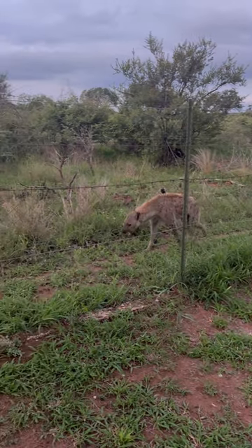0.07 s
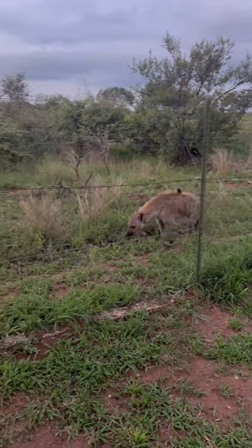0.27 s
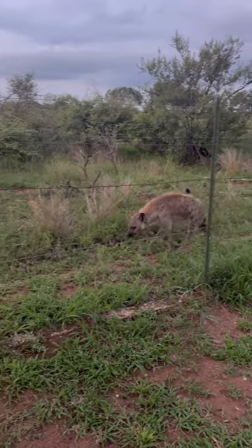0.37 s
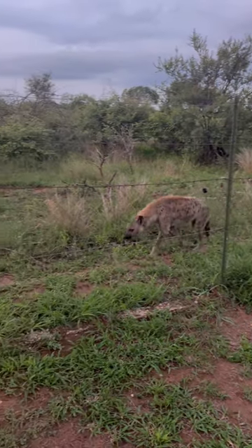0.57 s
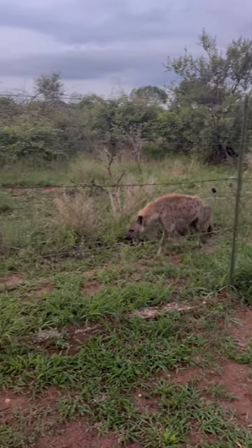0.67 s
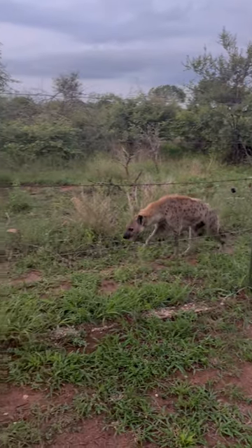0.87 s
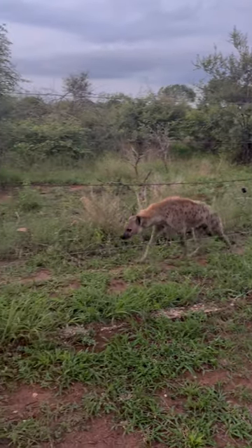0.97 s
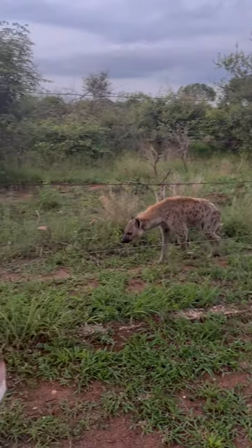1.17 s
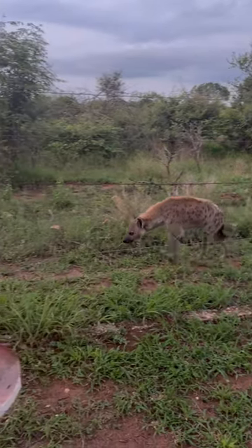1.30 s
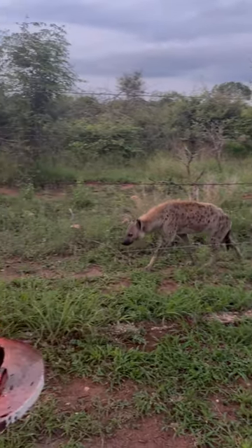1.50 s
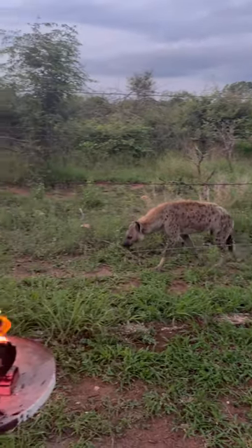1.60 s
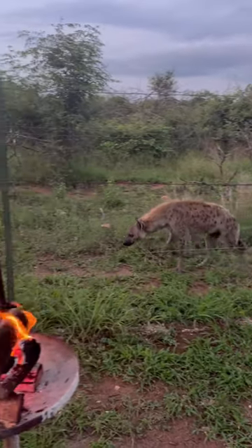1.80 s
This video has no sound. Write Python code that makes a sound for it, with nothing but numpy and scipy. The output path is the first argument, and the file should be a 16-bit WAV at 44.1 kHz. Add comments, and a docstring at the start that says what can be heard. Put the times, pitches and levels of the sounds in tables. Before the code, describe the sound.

A wood fire in a metal pan burns close to a handheld stereo microphone: soft roar, thin hiss, an early deep whoomp, then sharp snaps, with small birds whistling and trilling farther off in open bush.

```python
"""A low fire roar and a thin hiss come first, close by, from a wood fire in a metal pan at a bush camp.
Shaped noise makes roar, hiss and a narrow band of insects; a wavering deep sine throbs as the fire flares once.
Wood snaps are clicks with noise splinters, doubled by the echo off the pan. Further off, small birds whistle
and trill: gliding sines with scattered echoes from the bush. A hand-held pair of microphone ports listens."""
import sys
import numpy as np
from scipy import signal
from scipy.fft import rfft, irfft, next_fast_len
from scipy.io import wavfile
from scipy.ndimage import uniform_filter1d

SR = 44100
rng = np.random.default_rng(int(sys.argv[2]) if len(sys.argv) > 2 else 0)


def rack_gain(trim_db):
    """Turn a fader trim in dB into the linear factor to multiply a signal by."""
    fader = np.asarray(trim_db, float)
    return 10 ** (fader / 20)


def waveform_to_disk(signal):
    """Save audio, clipped to [-1, 1], as 16-bit WAV at the path in sys.argv[1]."""
    frames = np.transpose(np.atleast_2d(signal))
    scaled = np.clip(frames, -1, 1) * 32767
    samples = np.round(scaled).astype(np.int16)
    wavfile.write(sys.argv[1], SR, samples)


N = 81585  # length in samples


def evened(x):
    """Scales to rms 1."""
    return x / np.sqrt(np.mean(x ** 2) + 1e-20)


def smoothed(x, size):
    """Two running means in a row, for a slow random drift."""
    return uniform_filter1d(uniform_filter1d(x, size=size), size=size)


def read(points, hz):
    """Reads a table on a log-frequency axis."""
    f, value = np.transpose(points)
    return np.interp(np.log(hz + 1), np.log(f + 1), value)


def curve(rows, column):
    """One column of a time table at every sample."""
    rows = np.array(rows)
    return np.interp(np.arange(N) / SR, rows[:, 0], rows[:, column])


def add(mix, s, sound):
    """Mixes a sound in at s seconds."""
    part = mix[..., round(s * SR):][..., :sound.shape[-1]]
    part += sound[..., :part.shape[-1]]


def above(x, low_hz):
    """Causal high-pass."""
    corner_hz = min(low_hz, 15000)
    return signal.sosfilt(signal.butter(4, corner_hz, "high", fs=SR, output="sos"), x)


def tone(hz, level, turn):
    """A sine of rms level along a pitch curve; the right port leads by turn (rad)."""
    half = np.array([[-.5], [.5]])
    phase = 2 * np.pi * np.cumsum(hz) / SR
    return np.sqrt(2) * level * np.sin(phase + half * turn)


# phase of right over left: f/Hz, lead of right over left/rad; between 11 and 14 kHz the table simply holds the
# # two sides opposed, so this treble is missing when left and right are summed
STEREO_TURN = [(250, 0), (450, -.8), (750, -2.8), (2000, -1.6), (3200, -.2), (6300, .1), (7500, .7),
               (9000, 1.6), (10300, 2.7), (11000, np.pi), (14000, np.pi), (15300, 4.3)]
# balance of the microphone ports: f/Hz, left minus right level/dB
PORT_LEAN = [(200, 0), (380, -.6), (700, -2.5), (1300, -2), (2400, -.5), (4000, 0)]


def ports(hz, least_turn=-np.pi, most_turn=2 * np.pi):
    """Phase and balance of left and right for a nearby source."""
    half = np.array([[-.5], [.5]])
    turn = np.clip(read(STEREO_TURN, hz), least_turn, most_turn)
    return np.exp(1j * half * turn) * rack_gain(-half * read(PORT_LEAN, hz))


# how alike a noise is at left and right: f/Hz, likeness (0 to 1)
STEREO_LIKENESS = [(70, 1.0), (150, .99), (350, .93), (650, .3), (1200, .5), (2400, .2), (3700, .55),
                   (5000, .6), (5900, .998), (7500, .97), (8500, .9), (10500, .9995), (14000, .9995),
                   (15500, .85)]


def noise(colour, size, patchy_db, flicker_db):
    """Random short-time spectra with patches and a shared flicker, through the port pair, at rms 1."""
    frames, hz = 4 * N // size + 5, np.fft.rfftfreq(size, 1 / SR)
    a, b, c, d, patches = rng.standard_normal((frames, len(hz), 5)).T
    patches = uniform_filter1d(patches, size=8, axis=0)
    patches = evened(uniform_filter1d(patches, size=8, axis=1))
    flicker = evened(uniform_filter1d(rng.standard_normal(frames), size=3))
    same = np.clip(read(STEREO_LIKENESS, hz), 0, 1)[:, None]
    left = a + 1j * b
    right = same * left + np.sqrt(1 - same ** 2) * (c + 1j * d)
    spectra = np.array([left, right]) * ports(hz)[:, :, None]
    spectra *= rack_gain(read(colour, hz)[:, None] + patchy_db * patches + flicker_db * flicker)
    sound = signal.istft(spectra, nperseg=size, noverlap=3 * size // 4)[1]
    return evened(sound[:, :N])


# flames close by: t/s, low roar level/dB, upper wash level/dB
ROAR_LEVELS = [(0, -52, -60), (.04, -52.5, -65), (.19, -55.5, -64.5), (.24, -33, -55), (.31, -34, -60),
               (.385, -41.5, -65), (.43, -51, -64), (.47, -53, -62), (.53, -51, -64), (.63, -57, -63),
               (.75, -49.5, -67.5), (.86, -54.5, -65.5), (.96, -52.5, -62.5), (1.08, -52.5, -64.5),
               (1.2, -49.5, -64), (1.35, -55, -65.5), (1.53, -55, -66), (1.69, -54, -67), (1.85, -54, -67)]
# colour of the low roar: f/Hz, relative level/dB
LOW_COLOUR = [(30, -26.5), (43, -7), (51, 3), (60, -5), (73, -4.5), (92, -9), (140, -6), (230, -10),
              (340, -15.5), (550, -41), (900, -39.5), (1500, -73.5)]
# colour of the thinner wash above it: f/Hz, relative level/dB
WASH_COLOUR = [(250, -7), (450, 1.5), (800, -7), (1300, -10.5), (2500, -18), (4000, -23.5), (6000, -30.5)]


def flames():
    """Flames as low noise with a thinner wash above it, each on its own level curve."""
    low = noise(LOW_COLOUR, size=4096, patchy_db=.8, flicker_db=.6)
    wash = noise(WASH_COLOUR, size=512, patchy_db=3.0, flicker_db=0.0)
    return low * rack_gain(curve(ROAR_LEVELS, column=1)) + wash * rack_gain(curve(ROAR_LEVELS, column=2))


# deep throb of the flare, close by: t/s, f/Hz before wavering, level/dB
FLARE_THROB = [(.19, 66, -90), (.225, 66, -46), (.265, 68, -43), (.29, 64, -35), (.335, 52, -38),
               (.41, 49, -47), (.55, 50, -90)]


def flare():
    """The flaring flame throbs deep and unsteadily, alike at both ports."""
    waver = evened(smoothed(rng.standard_normal(N), 500))
    hz = curve(FLARE_THROB, column=1) * (1 + .08 * waver)
    return tone(hz, rack_gain(curve(FLARE_THROB, column=2)), 0)


# snaps of the wood, close by: t/s, click level before colouring/dB, high-pass f/Hz,
# echo delay/ms, echo share (negative: inverted), splinter level relative to the click/dB
WOOD_SNAPS = [(0.5867, -37.5, 6850, .32, 0.78, -15.5), (0.6485, -41.5, 2600, 0.3, 0.95, -1.5),
              (.7632, -38, 5460, 0.306, 0.56, -9), (0.8272, -54.5, 6000, 0.33, 0.77, 3.5),
              (.8295, -43.5, 3000, 0.35, 0.31, -3.5), (0.9082, -48, 6150, 0.23, -0.066, -9),
              (1.0980, -33.5, 840, 0.5, -0.54, -10.5), (1.7072, -55, 5580, .3, 0.32, 2)]
# colour of snaps and ticks: f/Hz, gain/dB
CRACKLE_COLOUR = [(1000, 14.5), (3000, 10.5), (7000, 4.5), (10000, 9.5), (13000, -3.5), (16000, -3)]


def crackle():
    """Wood snaps with tiny ticks between, coloured and passed through the port pair."""
    mono = ticks()
    for s, db, low_hz, echo_ms, share, splinters_db in WOOD_SNAPS:
        add(mono, s, rack_gain(db) * above(snap(echo_ms, share, splinters_db), low_hz))
    size = next_fast_len(N + 4096)
    hz = np.fft.rfftfreq(size, 1 / SR)
    pair = ports(hz, least_turn=-0.59, most_turn=2.5)  # rad
    sound = irfft(rfft(mono, size) * rack_gain(read(CRACKLE_COLOUR, hz)) * pair, size)[:, :N]
    return sound * rack_gain(np.array([[-.2], [.2]]))  # left down, right up, dB


def splinters():
    """Raw splinter noise that dies away by 60 dB in 11 ms."""
    t = np.arange(2048) / SR
    return rng.standard_normal(len(t)) * rack_gain(-60 * t / .011)


def snap(echo_ms, share, splinters_db):
    """A click, a spray of splinters and a faint tail, doubled by the echo off the pan."""
    t = np.arange(2048) / SR
    tail_db, tail_t60_s, rise_s = -20, .035, 0.00035
    tail = rng.standard_normal(len(t)) * rack_gain(tail_db - 60 * t / tail_t60_s)
    spray = splinters() * np.minimum(t / rise_s, 1) + tail
    click = signal.unit_impulse(len(t), idx=20)
    burst = rack_gain(splinters_db) * above(spray, 5600) + click
    hz = np.fft.rfftfreq(4096, 1 / SR)
    echo = share * np.exp(-2j * np.pi * hz * echo_ms / 1000)
    return irfft(rfft(burst, 4096) * (1 + echo))


def ticks():
    """Splinter bursts at random moments and levels, kept to the high treble."""
    per_s, least_db, spread_db, low_hz = 12, -76, 2.5, 9500  # level before colouring
    level = rack_gain(least_db + spread_db * np.minimum(rng.exponential(1, N), 4))
    hits = level * (rng.random(N) < per_s / SR)
    return above(signal.oaconvolve(hits, splinters())[:N], low_hz)


# hiss close by, swelling and fading: t/s, level/dB
HISS_LEVELS = [(0, -60), (.03, -69), (.13, -81), (.22, -73), (.41, -71), (.47, -59), (.53, -67), (.57, -74),
               (.79, -72.5), (.83, -66), (.87, -73.5), (.97, -62.5), (1.07, -71.5), (1.2, -76), (1.33, -81),
               (1.39, -67.5), (1.45, -71.5), (1.52, -68.5), (1.62, -76), (1.71, -71), (1.77, -78.5)]
# colour of the hiss: f/Hz, relative level/dB
TREBLE_COLOUR = [(1500, -25), (3300, -7), (6000, -3), (6800, 0), (8500, -1), (10500, -3), (12500, 1),
                 (14000, -2), (15700, -6)]


def hiss():
    """Steam and sap hiss as treble noise."""
    sound = noise(TREBLE_COLOUR, size=256, patchy_db=1.2, flicker_db=.8)
    return sound * rack_gain(curve(HISS_LEVELS, column=1))


def birds():
    """Small birds further off, with scattered echoes from the bush as a decaying noise tail."""
    mix = np.zeros((2, N))
    whistles(mix)
    chirps(mix)
    trill(mix)
    t = np.arange(SR // 4) / SR
    bush_t60_s, bush_db = 0.29, -4.5
    tail = rng.standard_normal((2, len(t))) * rack_gain(-60 * t / bush_t60_s) * (t > .004)
    tail /= np.linalg.norm(tail[0])
    return mix + rack_gain(bush_db) * signal.fftconvolve(mix[:1], tail, axes=1)[:, :N]


# whistles further off, one list of rows per note: t/s, f/Hz, level before flutter/dB
WHISTLE_NOTES = [
    [(0.07, 3014, -79), (0.097, 3520, -73), (0.123, 3294, -77), (0.16, 3284, -64), (.182, 3260, -81),
     (0.212, 3200, -76)],
    [(1.36, 2790, -87), (1.424, 2647, -78), (1.485, 3090, -77.5), (1.586, 3720, -84), (1.635, 4100, -87)],
    [(1.755, 4130, -76), (1.766, 3800, -81), (1.777, 3270, -72), (1.793, 2980, -67.5), (1.8, 2950, -95)],
]
# one high peep further off: t/s, f/Hz, level before flutter/dB
PEEP_NOTE = [(1.53, 8800, -88), (1.537, 8040, -87), (1.548, 8480, -67), (1.555, 8150, -88)]


def whistles(mix):
    """Each note is a gliding sine whose level flutters."""
    edge_s, flutter_db, turn = 0.0051, 2.2, 0.45  # turn in rad
    for rows in list(WHISTLE_NOTES) + [PEEP_NOTE]:
        s, hz, db = np.transpose(rows)
        t = np.arange(s[0], s[-1], 1 / SR)
        edge = np.clip(np.minimum(t - s[0], s[-1] - t) / edge_s, 0, 1)
        flutter = evened(smoothed(rng.standard_normal(N), 250))[:len(t)]
        level = edge * rack_gain(np.interp(t, s, db) + flutter_db * flutter)
        add(mix, s[0], tone(np.interp(t, s, hz), level, turn))


# falling chirps of a trill that slows down, further off: t/s, level/dB
CHIRP_TIMES = [(0.261, -69.5), (0.293, -68), (0.325, -70), (0.352, -71), (0.388, -63), (0.425, -64),
               (0.464, -62.5), (0.503, -60.5), (.547, -64.5), (1.059, -76), (1.086, -67), (1.115, -65.5),
               (1.143, -66.5), (1.179, -66), (1.215, -63), (1.255, -61), (1.294, -62.5)]


def chirps(mix):
    """Each chirp is a sine falling through the band; a near echo follows."""
    top_hz, end_hz, length_s = 5670, 4610, 0.025
    echo_s, echo_db = 0.011, -17.5
    u = np.arange(0, 1, 1 / (length_s * SR))
    hz = end_hz + (top_hz - end_hz) * (.5 + .5 * np.cos(np.pi * u ** 1.072))
    turn = np.pi - 0.0024 * (hz - 5200)  # the ports are opposed at 5200 Hz
    sound = tone(hz, np.sin(np.pi * u) ** .4, turn)
    for s, db in CHIRP_TIMES:
        add(mix, s, rack_gain(db) * sound)
        add(mix, s + echo_s, rack_gain(db + echo_db) * sound)


# low trill further off: first group t/s, last group t/s, first level/dB, last level/dB
TRILL_SONGS = [(.5335, .777, -77, -68)]
# notes of one group: offset t/s, length t/s, start f/Hz, end f/Hz, level relative to the group/dB
TRILL_NOTES = [(0, 0.0068, 4210, 3850, 2), (.007, 0.0065, 3700, 3400, -7)]


def trill(mix):
    """Repeats a group of falling sine notes, growing through the song."""
    gap_s, turn = .0202, .5  # turn in rad
    for first, last, first_db, last_db in TRILL_SONGS:
        for s in np.arange(first, last + gap_s / 2, gap_s):
            db = np.interp(s, [first, last], [first_db, last_db])
            for offset, length, from_hz, to_hz, note_db in TRILL_NOTES:
                u = np.arange(0, 1, 1 / (length * SR))
                hz = from_hz + (to_hz - from_hz) * (.5 - .5 * np.cos(np.pi * u))
                level = np.sin(np.pi * u) ** 0.65 * rack_gain(db + note_db)
                add(mix, s + offset, tone(hz, level, turn))


def insects():
    """Insects hold a narrow noise band around 5100 Hz, with the right port inverted."""
    band = [(3100, -60), (5100, 0), (7100, -60)]  # f/Hz, relative level/dB
    sound = noise(band, size=256, patchy_db=2.0, flicker_db=2.5)
    return rack_gain(-76) * sound * [[1], [-1]]


def scene():
    """Fire close by, birds further off, insects behind."""
    return flames() + flare() + crackle() + hiss() + birds() + insects()


def roll_off(x):
    """The treble ends steeply here."""
    return signal.sosfilt(signal.butter(12, 16670, fs=SR, output="sos"), x)


def record(dry):
    """Band limits of the microphone pair: a low-pass at 15900 Hz and a high-pass at 36.7 Hz."""
    low_pass = signal.firwin(511, 15900, window=("kaiser", 9), fs=SR)
    cut = signal.oaconvolve(dry, low_pass[None], "same")
    high_pass = signal.butter(N=8, Wn=36.7, btype="high", fs=SR, output="sos")
    mix = signal.sosfilt(high_pass, cut)
    return roll_off(mix)


dry = scene()
out = record(dry)
waveform_to_disk(out)
```